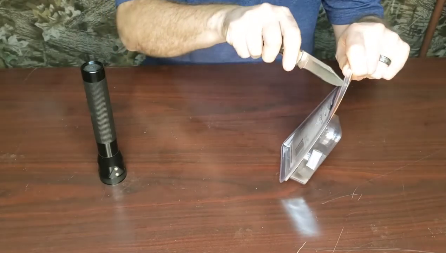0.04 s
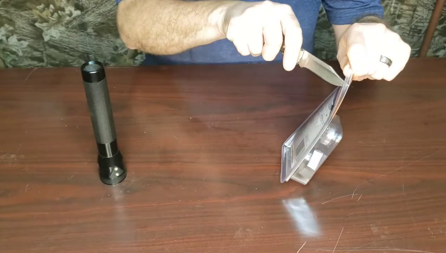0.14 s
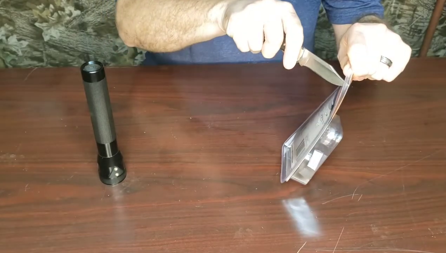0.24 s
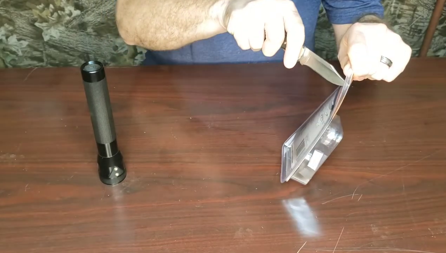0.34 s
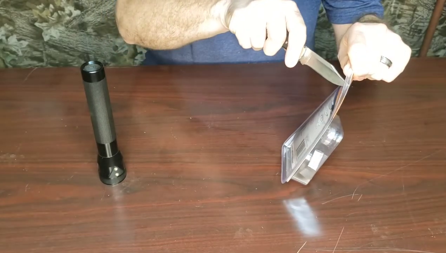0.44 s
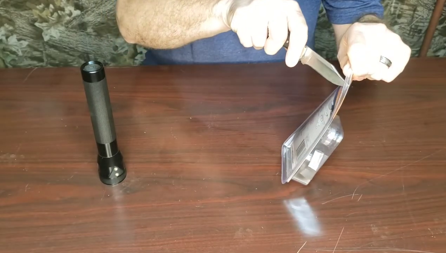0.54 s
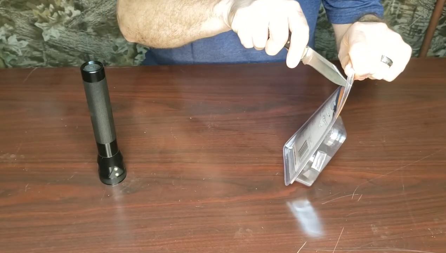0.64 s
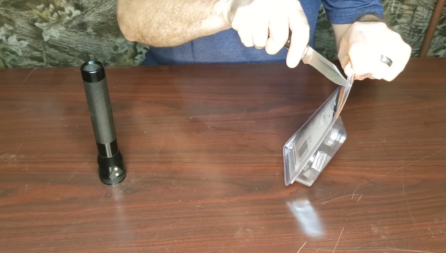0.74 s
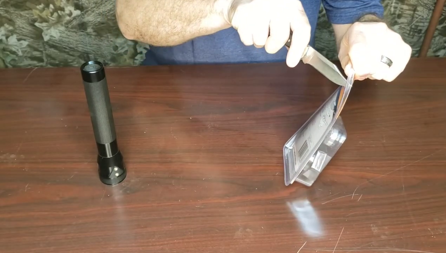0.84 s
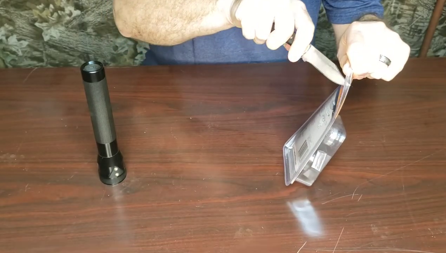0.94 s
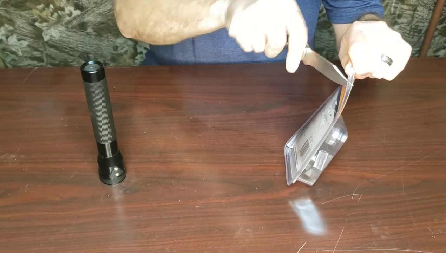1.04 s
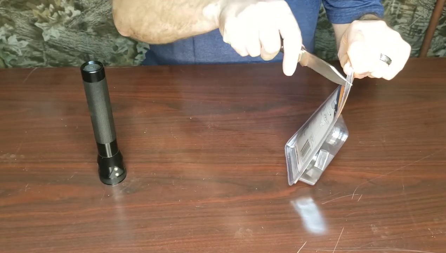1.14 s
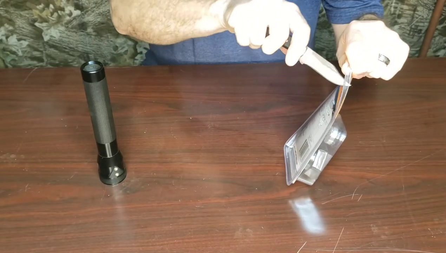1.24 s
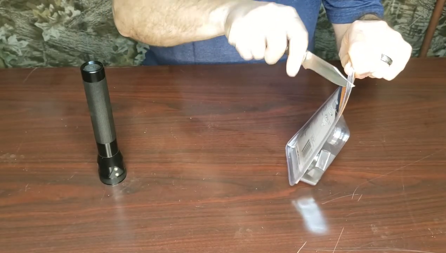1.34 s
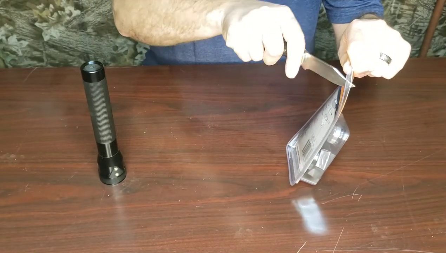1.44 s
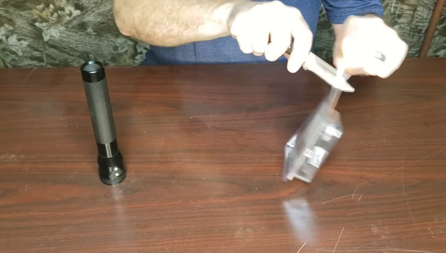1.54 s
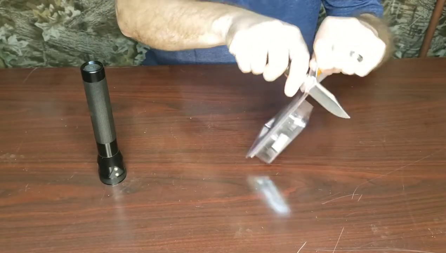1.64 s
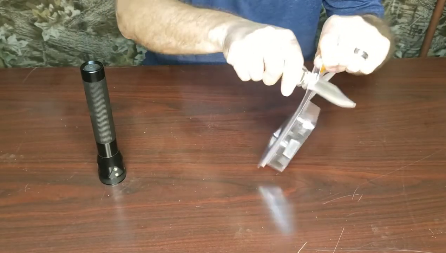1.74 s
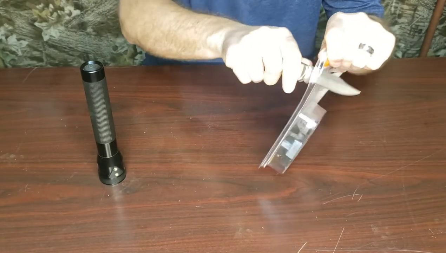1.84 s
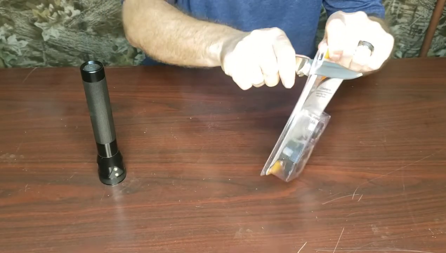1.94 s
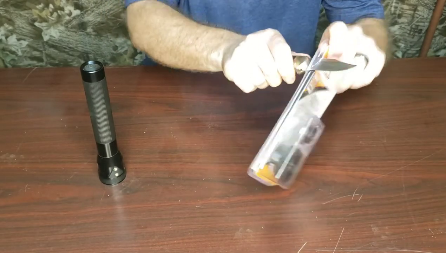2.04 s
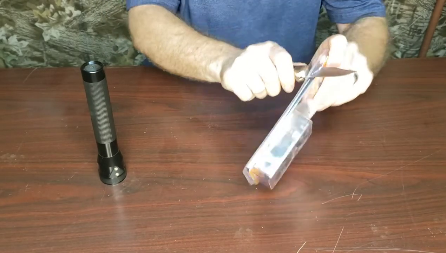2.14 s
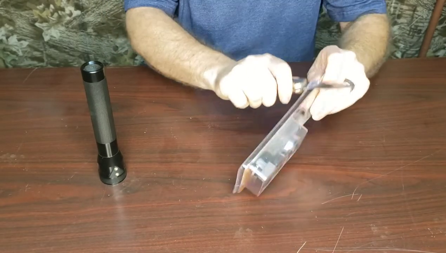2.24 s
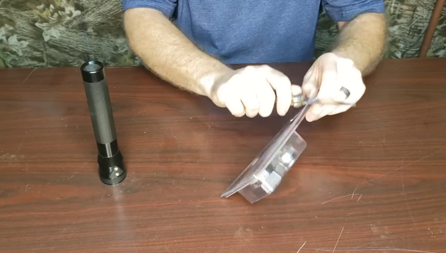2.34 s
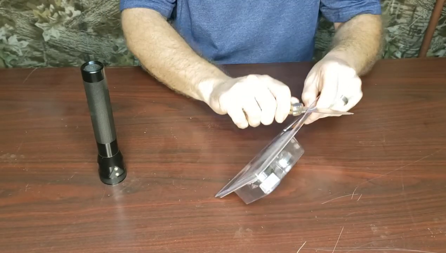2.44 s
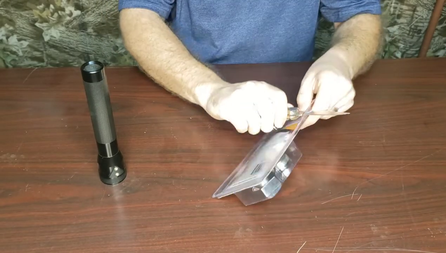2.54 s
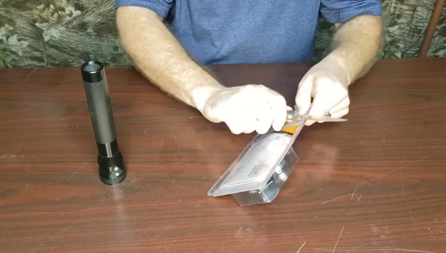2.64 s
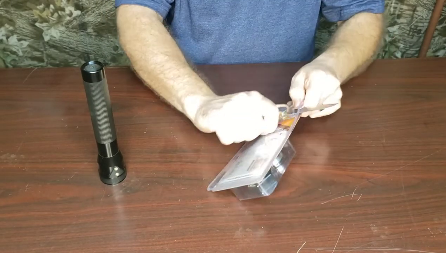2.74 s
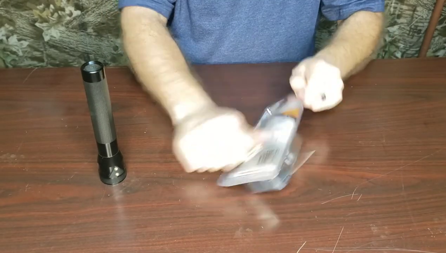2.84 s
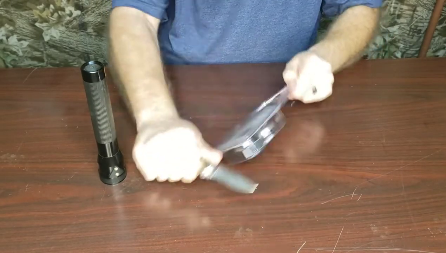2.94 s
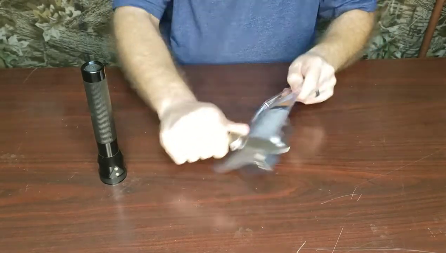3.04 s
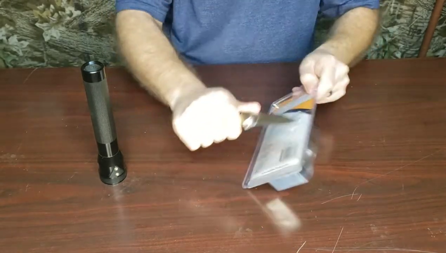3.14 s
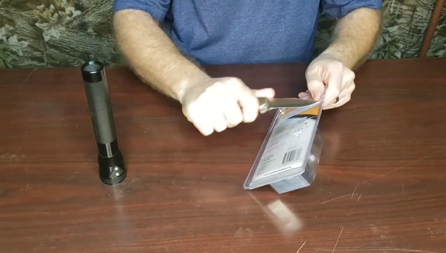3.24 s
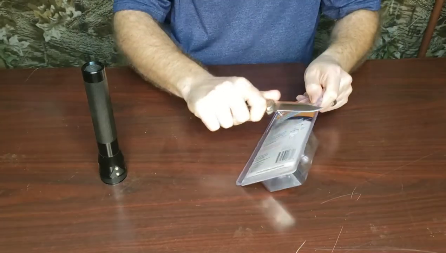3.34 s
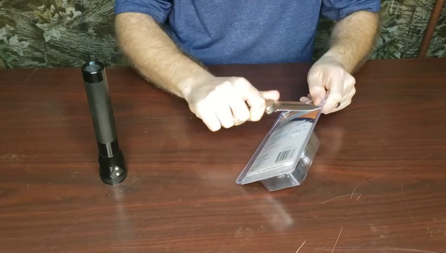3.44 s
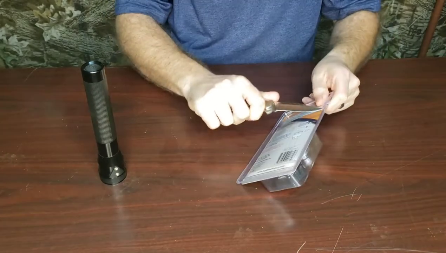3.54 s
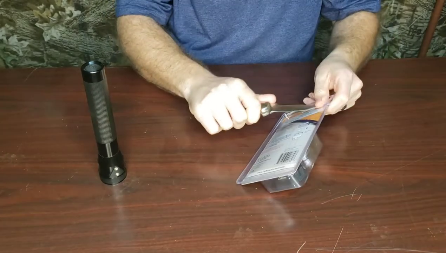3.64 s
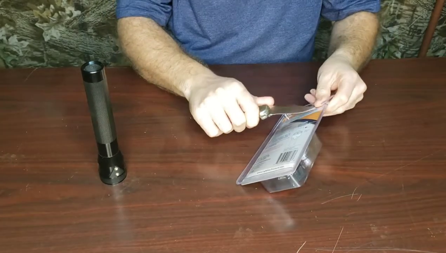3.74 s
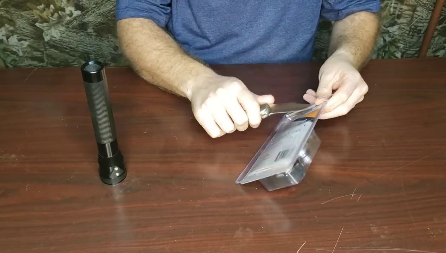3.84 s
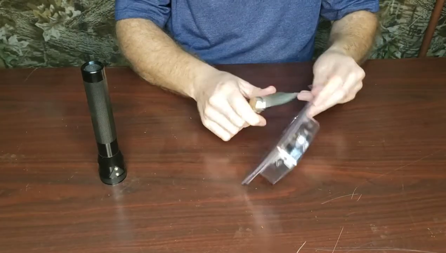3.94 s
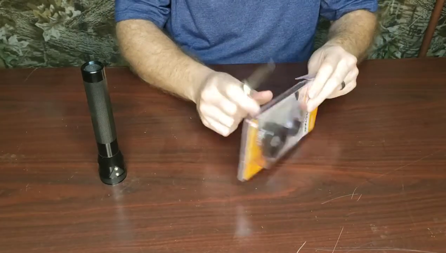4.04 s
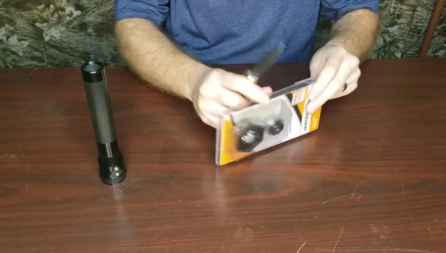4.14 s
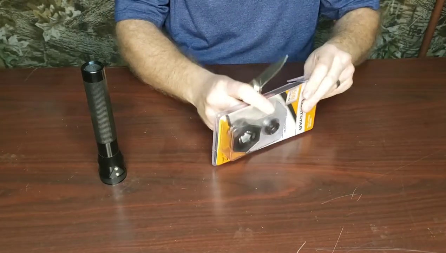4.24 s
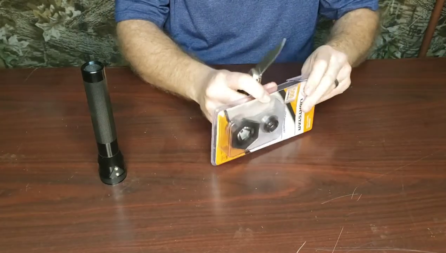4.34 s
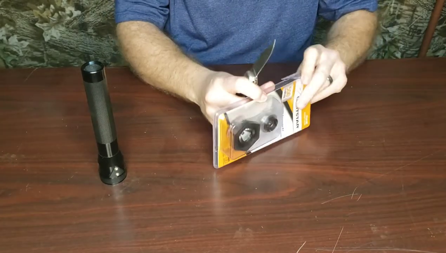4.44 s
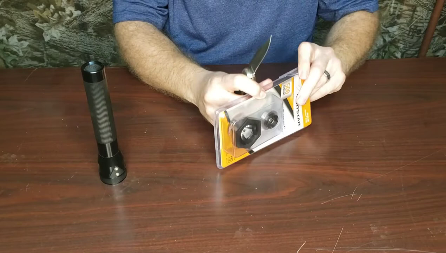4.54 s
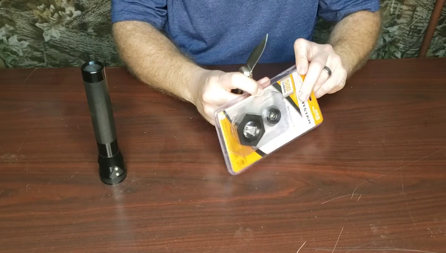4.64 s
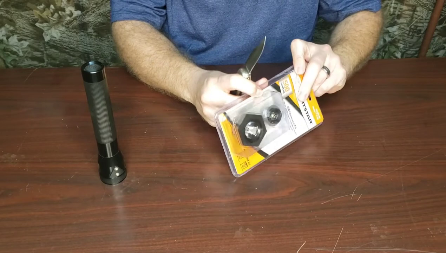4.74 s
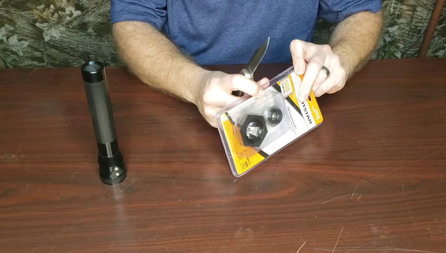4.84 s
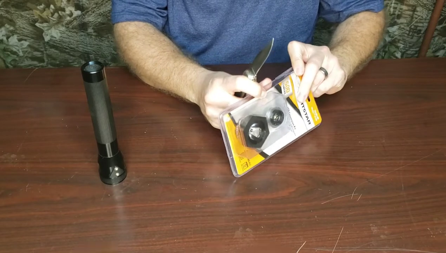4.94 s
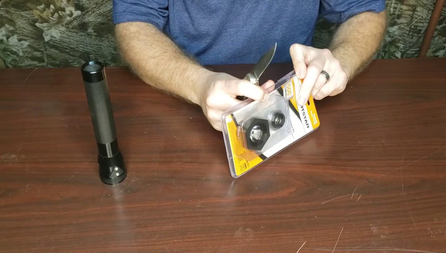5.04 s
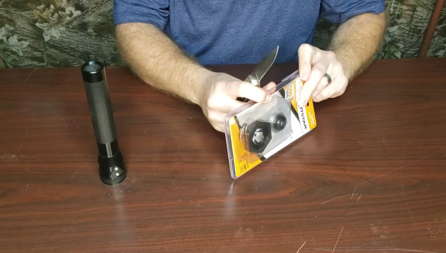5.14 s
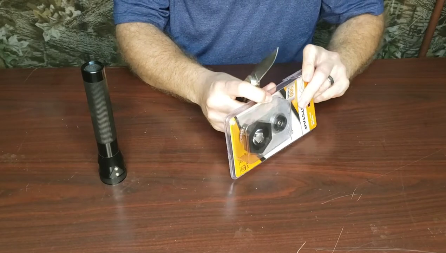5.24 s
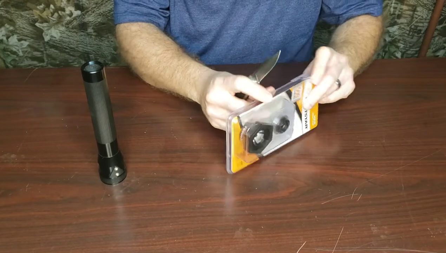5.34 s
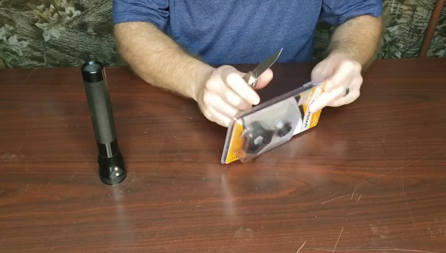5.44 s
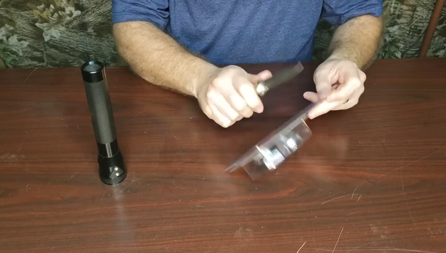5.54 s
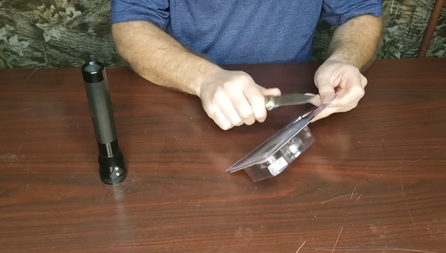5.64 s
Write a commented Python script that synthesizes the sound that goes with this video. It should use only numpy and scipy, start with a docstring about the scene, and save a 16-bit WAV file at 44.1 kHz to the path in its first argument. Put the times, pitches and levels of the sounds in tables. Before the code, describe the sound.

Quiet hiss and tiny ticks give way to loud cracks and rasping scrapes of a hard plastic shell, with faint low table thuds.

```python
"""A small quiet room: a knife works at a stiff plastic blister pack on a wooden table.
From the start the microphone hears filtered-noise hiss and the pack rubbed by slips; its hollow shell
knocks as ringing modes. Then come faint far whistles of wandering tone, and creases snapping as short
noise bursts. From about 1.1 s the blade tears and scrapes the sheet in dense runs of slips,
and from about 1.7 s the table thuds in low modes. The room answers the pack with diffuse echoes."""
import sys
import numpy as np
from scipy import signal
from scipy.fft import rfft, irfft
from scipy.io import wavfile
from scipy.ndimage import uniform_filter1d

SR = 44100
rng = np.random.default_rng(int(sys.argv[2]) if len(sys.argv) > 2 else 0)


def inscribe(sig):
    """Save sig as 16-bit PCM at rate SR to the path in sys.argv[1].

    A 1-D sig is mono; a 2-D sig holds one channel per row.
    Samples are clipped to [-1, 1] before scaling.
    """
    pcm = np.round(np.clip(np.atleast_2d(sig).T, -1, 1) * 32767)
    wavfile.write(sys.argv[1], SR, pcm.astype(np.int16))


N = 250461
T = np.arange(N) / SR


def undb(db):
    """Turns decibels into an amplitude factor."""
    return 10 ** (np.asarray(db) / 20)


def unit(x):
    """Scales a signal to rms 1."""
    return x / np.sqrt(np.mean(x ** 2))


def fade(t, t60):
    """Decays exponentially by 60 dB in t60 seconds, 3 ms at least."""
    return np.exp(-np.log(1000) * t / np.maximum(t60, 0.003))


def add(out, start_s, x):
    """Lays a sound into the track at its start time, cut at the end of the track."""
    i = int(start_s * SR)
    out[i:i + len(x)] += x[:N - i]


def excerpt(x, start_s, length):
    """Takes the stretch of a running noise that begins at start_s, wrapping at the end."""
    return np.roll(x, -int(start_s * SR))[:length]


def colour(x, spectrum):
    """Weights a noise by (f/Hz, level/dB) points, joined along log frequency; rms 1."""
    hz, db = np.transpose(spectrum)
    f = np.maximum(np.arange(len(x) // 2 + 1) * SR / len(x), 1)
    weight = undb(np.interp(np.log(f), np.log(hz), db))
    return unit(irfft(rfft(x) * weight, len(x)))


def lift(x, hz, width, boost):
    """Raises the range round hz by a resonance, its width a share of hz; rms 1."""
    peak = signal.iirpeak(np.clip(hz, 200, 11000), 1 / width, fs=SR)
    return unit(x + boost * signal.lfilter(*peak, x))


# spectrum of the hiss of room and microphone: f/Hz, relative level/dB per Hz
HISS_SPECTRUM = [(15, -83), (25, -15), (49, -3.5), (180, -6), (281, -15), (355, -9), (394, -15),
                 (794, -13.5), (1370, -14.5), (1920, -21), (2080, -22), (2490, -18), (3500, -22.5),
                 (10400, -25.5), (12500, -47), (16200, -93), (22000, -120)]
HISS_DB = -59  # rms level at the microphone, before its own filters


def hiss():
    """The steady hiss of room and microphone is noise with a fixed spectrum."""
    return undb(HISS_DB) * colour(rng.standard_normal(N), HISS_SPECTRUM)


def slips(rate, scatter_db, smear_s):
    """Noise made of tiny stick-slip releases (rate per s) of uneven size, each with a short tail."""
    released = rng.random(N) < rate / SR
    size = released * undb(scatter_db * np.minimum(rng.exponential(size=N), 3.5))
    keep = np.exp(-1 / (smear_s * SR))
    energy = signal.lfilter([1], [1, -keep], size ** 2)
    return unit(rng.standard_normal(N) * np.sqrt(energy + 1e-9))


# spectrum of the plastic sheet: f/Hz, relative level/dB per Hz
SHEET_SPECTRUM = [(1290, -21), (2200, -3.5), (2700, -7), (3140, -8), (3430, -6), (3710, -1), (4170, -1),
                  (5230, -3), (5540, -3.5), (6450, -0.5), (7350, -3), (8950, -1), (11200, -14.5),
                  (12500, -42), (16200, -99), (22000, -120)]


def crackle(rate, scatter_db, smear_s, patch_hz=900):
    """Each small patch of the sheet slips on its own and rings in its own narrow range."""
    out = 0
    shared = slips(rate / 3, scatter_db, smear_s)
    for hz in np.arange(2000, 12000, patch_hz):
        band = signal.butter(2, [hz, hz + patch_hz], "band", fs=SR, output="sos")
        patch = slips(rate / 4, scatter_db, 2 * smear_s) + 0.36 * shared
        out = out + signal.sosfilt(band, patch)
    return colour(out, SHEET_SPECTRUM)


# modes of the hollow shell: f/Hz, relative level/dB, free ring t60/s (scaled where it is played)
SHELL_MODES = [(208.5, -5.5, 0.07), (290.7, -1.5, 0.054), (352.4, -2, 0.054), (443, -2.5, 0.087),
               (516, -1, 0.053), (612, -1.5, 0.062), (668, -2.5, 0.099), (790.5, -1.5, 0.054),
               (853, -6, 0.085), (932.5, 0, 0.056), (1040.5, -5, 0.11), (1073, 0.5, 0.031), (1194, 0, 0.04),
               (1309, -2, 0.049), (1419, -2, 0.051), (1510, -1, 0.036), (1640, -2, 0.038),
               (1757, -6.5, 0.063), (1891, -2, 0.064), (2115, -3, 0.068), (2342, -5.5, 0.13),
               (2780, 0, 0.012)]


def shell(push, damping):
    """All modes of the shell rung by a running force; hands on it shorten the ring."""
    out = 0
    for k, (hz, db, t60) in enumerate(SHELL_MODES):
        pole = fade(1 / SR, t60 * damping) * np.exp(2j * np.pi * hz / SR)
        ring = signal.lfilter([1], [1, -pole], push).imag
        out = out + (-1) ** k * undb(db) * np.sqrt(1 - abs(pole)) * ring  # signs alternate
    return unit(out)


RUB_TREBLE_DB = -6.5  # treble of the shell rumble against its bass
# blade, fingers and table rub the pack: t/s, sheet hiss level/dB, shell rumble level/dB
RUB_LEVELS = [(0.0, -76, -69), (1.41, -60, -55.5), (1.66, -60, -58), (1.77, -38.5, -31.5),
              (1.96, -47.5, -50), (2.12, -57, -47.5), (2.53, -48.5, -43), (2.72, -63, -57),
              (2.88, -63, -51), (3.01, -41, -40.5), (3.14, -42.5, -35.5), (3.29, -64, -62),
              (3.51, -58.5, -53.5), (3.78, -65.5, -73), (4.22, -58.5, -66), (4.49, -53, -47),
              (4.76, -62, -52), (5.08, -67.5, -57.5), (5.39, -63, -58.5), (5.68, -49.5, -41)]


def rub(dull_hz=700):
    """Slow handling: finer slips in the sheet; soft skin shakes the shell dully."""
    s, *columns = np.transpose(RUB_LEVELS)
    sheet_db, shell_db = (np.interp(T, s, column) for column in columns)
    body = shell(slips(500, 1.6, 0.0028), 0.68)
    dull = signal.sosfilt(signal.butter(2, dull_hz, fs=SR, output="sos"), body)
    rumble = dull + undb(RUB_TREBLE_DB) * (body - dull)
    return undb(sheet_db) * crackle(900, 2.9, 0.0023) + undb(shell_db) * rumble


RATTLE = 0.045  # line width of a knocked mode over its frequency
KNOCK_RING, KNOCK_RING_PER_DB = 0.76, 0.05  # ring in free ring times at 0 dB; gentler knocks ring longer
BITE_DB, BITE_T60_S = -1, 0.033  # the first contact is louder than the ring that follows
# the shell knocks on table, blade or hand: t/s, peak level/dB, centre f/Hz, treble fall/dB per octave
KNOCK_EVENTS = [(0.048, -43, 464, 4.5), (0.248, -46.5, 300, 9), (0.802, -40.5, 620, 8.5),
                (1.165, -50, 506, 17), (1.254, -49, 433, 23), (1.384, -43.5, 406, 6), (1.401, -42, 360, 21),
                (1.481, -42, 470, 0), (1.513, -41.5, 474, 9), (1.537, -31.5, 446, 4),
                (1.711, -26.5, 335, 0), (1.735, -23.5, 444, 5.5), (1.809, -17.5, 540, 3),
                (1.835, -16.5, 630, 9), (1.8536, -5, 680, 7.5), (1.866, -22, 937, 14),
                (1.888, -15.5, 1000, 7), (1.93, -24, 950, 9), (2.318, -18.5, 760, 6.5),
                (2.7937, -17.5, 770, 5), (2.936, -34.5, 458, 9), (3.025, -13, 890, 2),
                (3.045, -11, 1580, 12), (3.15, -29, 1010, 11), (3.165, -6, 642, 0), (3.449, -48.5, 641, 12),
                (3.505, -42.5, 560, 3), (3.595, -43.5, 553, 3), (3.682, -32.5, 900, 9),
                (3.744, -55, 760, 17), (3.832, -33.5, 1260, 12), (4.288, -42, 460, 7),
                (4.309, -15, 556, 9.5), (4.347, -20, 286, 3), (4.376, -25.5, 306, 3),
                (4.582, -26.5, 720, 8.5), (4.594, -25.5, 730, 1.5), (4.915, -33.5, 643, 4),
                (5.091, -41.5, 805, 6), (5.183, -39.5, 646, 0.5), (5.277, -35.5, 347, 5.5),
                (5.312, -38, 690, 2.5), (5.542, -30, 250, 0.5), (5.632, -39, 790, 17)]


def knocks(spread_db=3, contact_s=0.00075):
    """Each knock rings the modes near its centre most; the spot struck sets their shares anew."""
    out, t = np.zeros(N), T[:SR // 4]
    hz, db, t60 = (c[:, None] for c in np.transpose(SHELL_MODES))
    chance = rng.standard_normal((len(KNOCK_EVENTS), 2, len(SHELL_MODES), 1))
    for (s, peak_db, centre_hz, soft_db), (gain, lag) in zip(KNOCK_EVENTS, chance):
        octaves = np.log2(hz / centre_hz)
        # a softer contact starves the upper modes; below the centre they fall 7 dB per octave
        tilt_db = np.where(octaves > 0, soft_db, -7) * octaves
        share = undb(db + spread_db * gain - tilt_db)
        # the loose, flexing shell rattles, so each mode's phase wanders
        steps = rng.standard_normal((len(SHELL_MODES), len(t)))
        drift = np.cumsum(steps, axis=1) * np.sqrt(2 * np.pi * RATTLE * hz / SR)
        drift = uniform_filter1d(drift, size=40, axis=1)
        ring_t60 = t60 * (KNOCK_RING - KNOCK_RING_PER_DB * peak_db)
        ring = np.sin(2 * np.pi * hz * t + 0.7 * lag + drift) * fade(t, ring_t60)
        knock = np.sum(share * ring, axis=0) * (1 - np.exp(-t / contact_s))
        knock = knock * (1 + undb(BITE_DB) * fade(t, BITE_T60_S))
        add(out, s, undb(peak_db) * knock / np.abs(knock).max())
    return out


# faint far whistles, perhaps birds: t/s, length/s, from f/Hz, to f/Hz, level at mid-length/dB
WHISTLE_EVENTS = [(.49, .11, 1870, 1870, -70), (.65, .12, 1870, 1870, -69), (.43, .1, 2900, 2700, -68),
                  (.79, .13, 2900, 2450, -67), (.92, .08, 2450, 2400, -73), (1.16, .08, 2900, 2450, -68),
                  (1.14, .07, 3700, 3300, -68)]


def whistles(blur_hz=12, glide_blur=0.12):
    """Soft far-off tones whose phase wanders, the more the further they glide down."""
    out = np.zeros(N)
    for s, length, from_hz, to_hz, db in WHISTLE_EVENTS:
        u = T[:int(length * SR)] / length
        width = blur_hz + glide_blur * (from_hz - to_hz)
        wander = np.sqrt(2 * np.pi * width / SR) * rng.standard_normal(len(u))
        pitch_hz = from_hz + (to_hz - from_hz) * u
        phase = np.cumsum(2 * np.pi * pitch_hz / SR + wander)
        swell = np.sqrt(2 * np.sin(np.pi * u))
        add(out, s, undb(db) * swell * np.sin(phase))
    return out


# creases snap: t/s, level/dB (before a common 5.5 dB cut), centre f/Hz, t60/s
SNAP_EVENTS = [(0.477, -30, 8600, 0.016), (1.118, -43, 5100, 0.063), (1.3755, -30.5, 6170, 0.02),
               (1.481, -38, 5850, 0.03), (1.542, -39, 3530, 0.21), (1.5827, -43, 4020, 0.024),
               (1.745, -24, 3800, 0.034), (1.8517, -22.5, 6600, 0.072), (1.87, -30, 7500, 0.035),
               (1.928, -29, 6640, 0.038), (2.3172, -25, 6600, 0.17), (2.4336, -30, 5200, 0.033),
               (2.4924, -30, 4250, 0.029), (2.5474, -33.5, 8640, 0.065), (2.793, -31.5, 7000, 0.047),
               (2.8753, -30, 8000, 0.043), (3.1398, -37, 8940, 0.035), (3.1652, -15.5, 6440, 0.028),
               (3.7425, -44.5, 8620, 0.032), (3.832, -32, 7040, 0.025), (3.8863, -46, 7030, 0.037),
               (4.288, -43, 5750, 0.017), (4.3064, -14.5, 7700, 0.084), (4.348, -26, 6700, 0.075),
               (4.374, -27.5, 6000, 0.032), (4.4112, -26, 8100, 0.024), (4.581, -24.5, 6840, 0.073),
               (4.916, -44, 4610, 0.04), (5.033, -25.5, 8550, 0.017), (5.09, -41, 6430, 0.035),
               (5.1064, -42, 7010, 0.03), (5.1242, -35, 6640, 0.025), (5.1472, -40, 6580, 0.032),
               (5.1834, -29, 7600, 0.024), (5.2756, -33.5, 8290, 0.03), (5.3123, -35.5, 6460, 0.11),
               (5.5398, -30.5, 6250, 0.059), (5.5642, -31, 8780, 0.033)]


def snaps(width=0.2, rise_s=0.0003):
    """Each snap is a short noise burst of the sheet, lifted round its own centre."""
    out, t = np.zeros(N), T[:SR // 5]
    sheet = colour(rng.standard_normal(N), SHEET_SPECTRUM)
    for s, db, hz, t60 in SNAP_EVENTS:
        burst = lift(excerpt(sheet, s, len(t)), hz, width, 1.1)
        shape = fade(t, t60) * (1 - np.exp(-t / rise_s)) ** 2
        add(out, s, undb(db - 5.5) * burst * shape)
    return out


TEAR_RISE_SHARE, TEAR_SHELL_HZ = 0.38, 1310  # part of the stroke spent rising; where the shell is lifted
# the blade rips or an edge scrapes along the sheet: start t/s, sheet level/dB, stroke/s, t60/s,
# shell level/dB against the sheet, lifted f/Hz of the sheet
TEAR_EVENTS = [(1.11, -57.5, 0.032, 0.28, -27, 4500), (1.711, -33.5, 0.052, 0.11, -1, 6200),
               (1.736, -25.5, 0.012, 0.029, -8.5, 6330), (1.765, -24, 0.03, 0.08, -3, 4250),
               (2.041, -40.5, 0.106, 0.12, -4, 7450), (2.635, -36.5, 0.035, 0.62, -6.5, 7500),
               (2.755, -46.5, 0.045, 0.07, 0, 8200), (2.84, -47.5, 0.06, 0.11, -1.5, 8200),
               (2.91, -42, 0.061, 0.091, -4, 8150), (2.976, -41, 0.023, 0.044, 0, 7000),
               (3.003, -15.5, 0.0068, 0.05, -17.5, 5750), (3.011, -19, 0.0081, 0.14, -10.5, 4420),
               (3.038, -19, 0.0096, 0.086, -6, 5500), (3.221, -33.5, 0.017, 0.25, -16, 9000),
               (3.27, -49.5, 0.052, 0.048, -2, 8850), (3.949, -52.5, 0.038, 0.13, -7.5, 8600),
               (4.008, -52.5, 0.048, 0.15, -8.5, 8060), (4.059, -47.5, 0.082, 0.12, -7.5, 5600),
               (4.144, -40.5, 0.039, 0.082, -17, 4030), (4.724, -51, 0.052, 0.27, -1, 3840),
               (4.79, -47.5, 0.037, 0.066, 2.5, 6700), (4.82, -43.5, 0.042, 0.088, 2.5, 6740),
               (5.47, -50.5, 0.079, .08, -2, 8500)]


def tears():
    """A rip is a dense run of slips: it hisses in the sheet and shakes the shell."""
    out, t = np.zeros(N), T[:SR // 2]
    sheet = crackle(1500, 2.8, 0.0011)
    body = shell(slips(980, 1.9, 0.0073), 0.64)
    for s, db, stroke, t60, shell_db, sheet_hz in TEAR_EVENTS:
        rise = max(TEAR_RISE_SHARE * stroke, 0.001)
        shape = np.clip(t / rise, 0, 1) ** 2 * fade(np.maximum(t - stroke, 0), t60)
        rip = lift(excerpt(sheet, s, len(t)), sheet_hz, 0.17, 0.77)
        shake = lift(excerpt(body, s, len(t)), TEAR_SHELL_HZ, 0.97, 2.15)
        add(out, s, undb(db) * shape * (rip + undb(shell_db) * shake))
    return out


# modes of the wooden table top: f/Hz, t60/s
TABLE_MODES = [(113, 0.21), (148, 0.11), (200, 0.14)]
# the table top thuds as the pack lands or drags: t/s, level/dB, favoured f/Hz
THUD_EVENTS = [(1.747, -39, 150), (1.852, -44, 200), (2.161, -39, 150), (2.212, -40.5, 112),
               (2.319, -38, 112), (2.343, -38, 112), (4.306, -39, 200), (4.582, -45, 200),
               (4.701, -49, 112), (5.541, -42, 200)]


def thuds(rise_s=0.0019, fall_db=45):
    """A dull low ring of the wood; the spot struck favours the modes near its pitch."""
    out, t = np.zeros(N), T[:SR // 2]
    hz, t60 = (c[:, None] for c in np.transpose(TABLE_MODES))
    rings = np.sin(2 * np.pi * hz * t) * fade(t, t60) * (1 - np.exp(-t / rise_s))
    for s, level_db, spot_hz in THUD_EVENTS:
        mode_db = level_db - fall_db * np.abs(np.log2(hz / spot_hz))  # fall per octave off the pitch
        add(out, s, np.sum(undb(mode_db) * rings, axis=0))
    return out


ROOM_T60_S, ROOM_TREBLE_T60_S, ROOM_DB = 0.34, 0.14, -13.5


def room(x, gap_s=0.00762):
    """Diffuse echoes of the small room after a short gap; the treble dies sooner."""
    t = T[:SR // 2]
    noise = rng.standard_normal(len(t))
    low = signal.sosfilt(signal.butter(2, 2500, fs=SR, output="sos"), noise)
    echo = low * fade(t, ROOM_T60_S) + (noise - low) * fade(t, ROOM_TREBLE_T60_S)
    echo = echo * (t > gap_s)
    echo = echo / np.sqrt(np.sum(echo ** 2) * 2500 / (SR / 2) * 4)  # level set by its energy
    return undb(ROOM_DB) * signal.fftconvolve(x, echo)[:N]


def scene():
    """The pack on its table with the room's echoes, far whistles and hiss."""
    # so small a shell radiates no deep bass
    no_bass = signal.butter(1, 70, "high", fs=SR, output="sos")
    plastic = signal.sosfilt(no_bass, rub() + knocks() + snaps() + tears())
    pack = plastic + thuds()
    return (pack + room(pack) + whistles() + hiss())[None]


TOP_HZ = 12500  # upper limit of the recorder


def record(dry):
    """The microphone loses the deep bass and dips near 3 kHz; the recorder cuts the top."""
    dry = signal.sosfilt(signal.butter(3, 55, "high", fs=SR, output="sos"), dry)
    dry = dry - 0.09 * signal.lfilter(*signal.iirpeak(3200, 4.5, fs=SR), dry)
    return signal.sosfilt(signal.ellip(10, 0.2, 70, TOP_HZ, fs=SR, output="sos"), dry)


dry = scene()
out = record(dry)
inscribe(out)
```